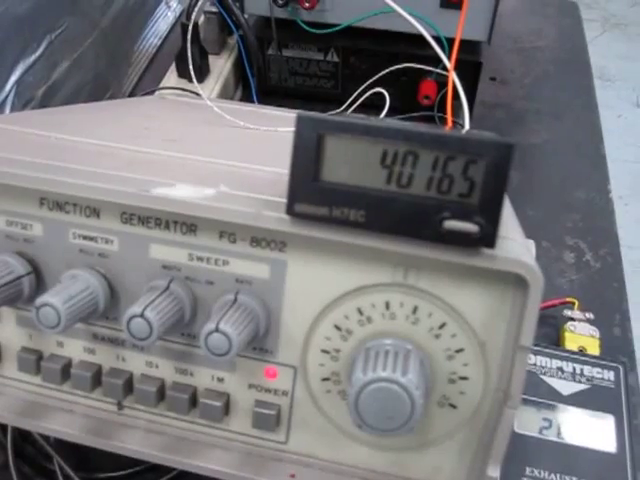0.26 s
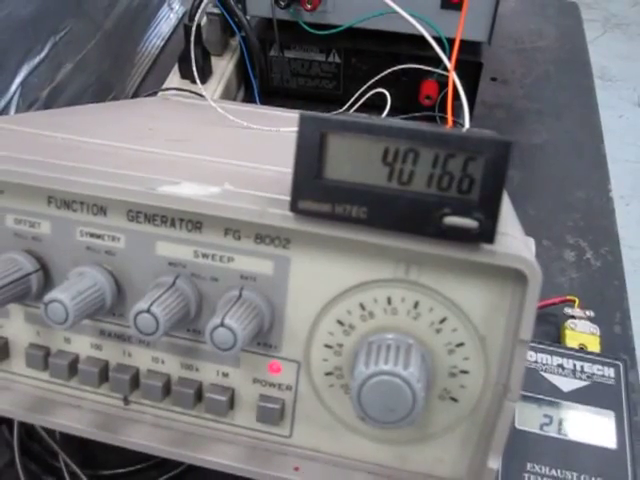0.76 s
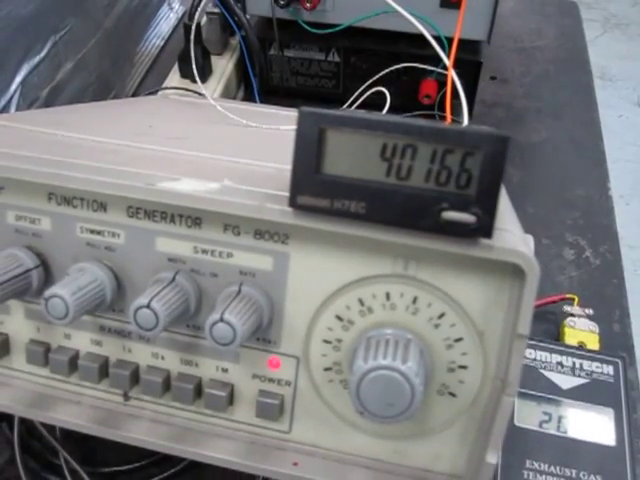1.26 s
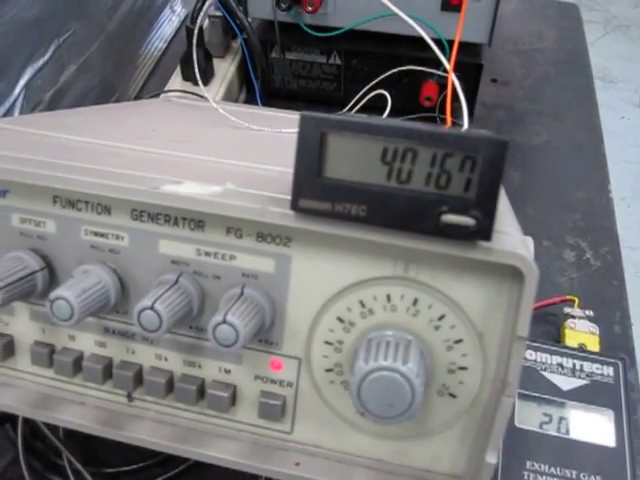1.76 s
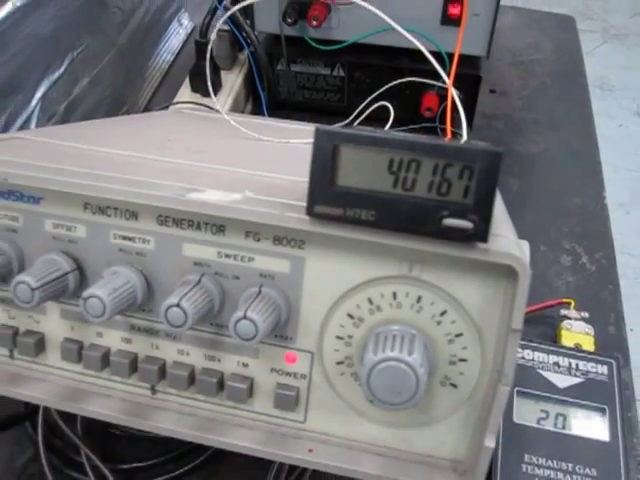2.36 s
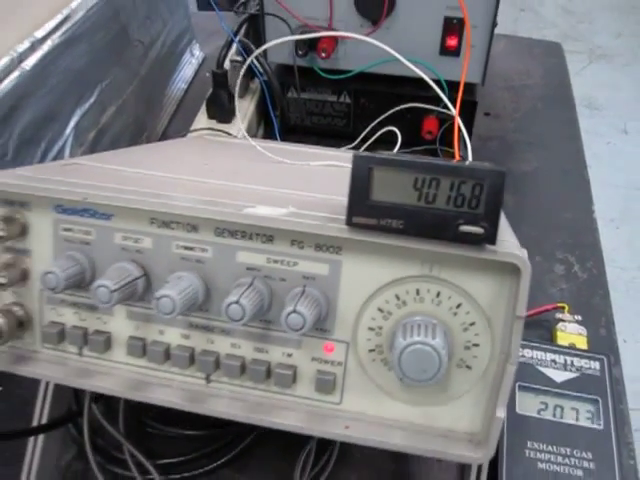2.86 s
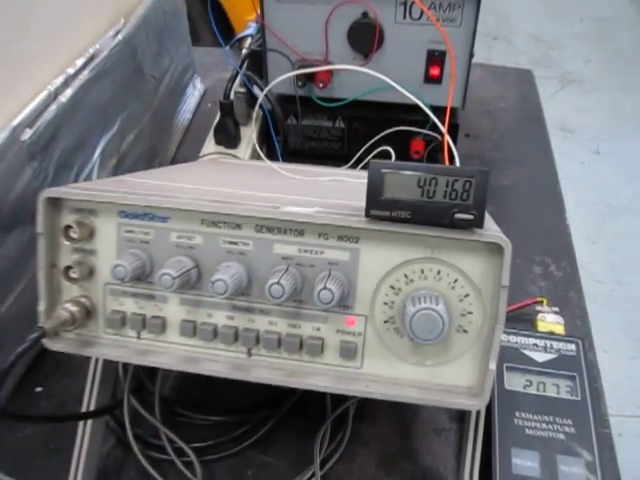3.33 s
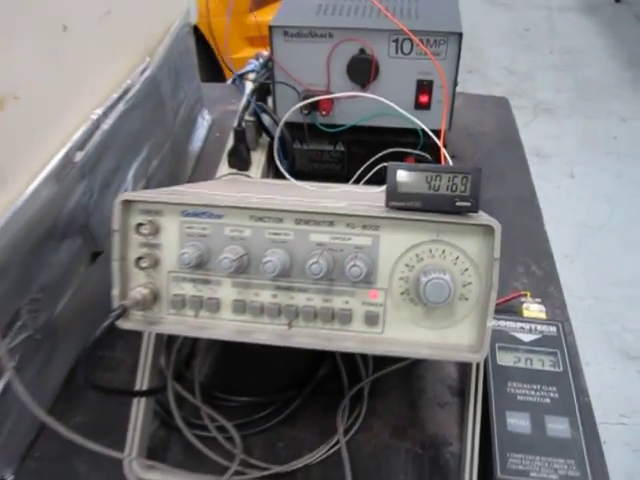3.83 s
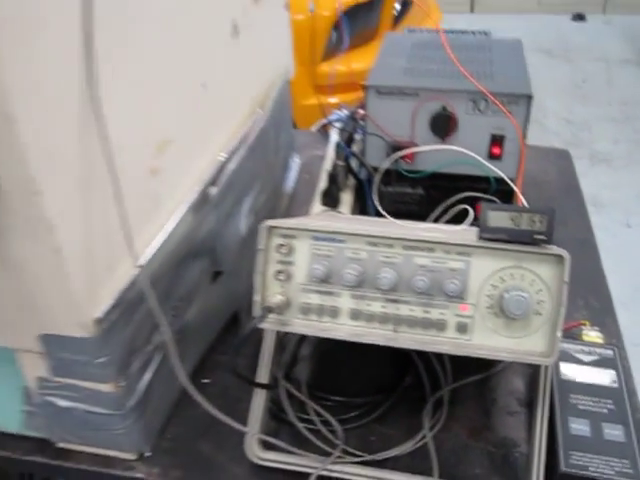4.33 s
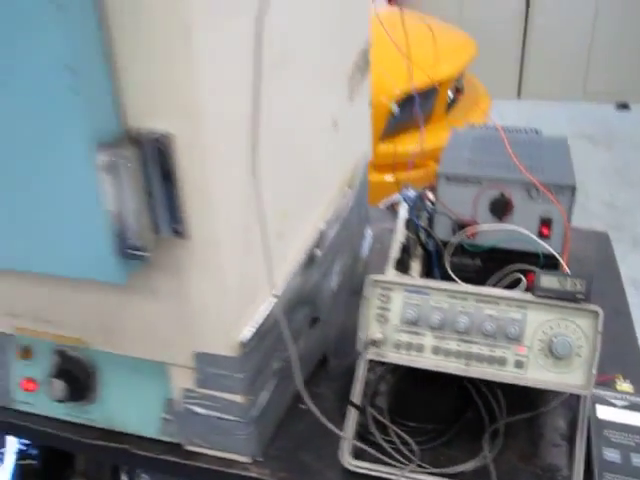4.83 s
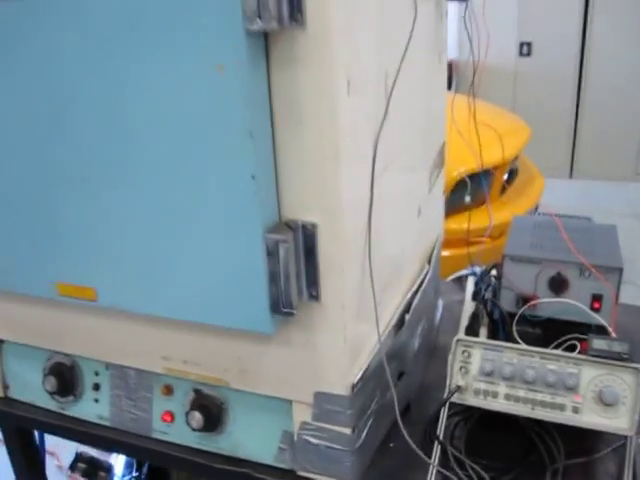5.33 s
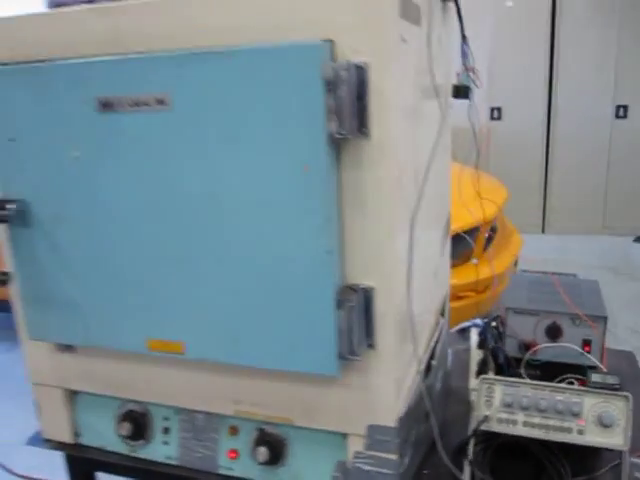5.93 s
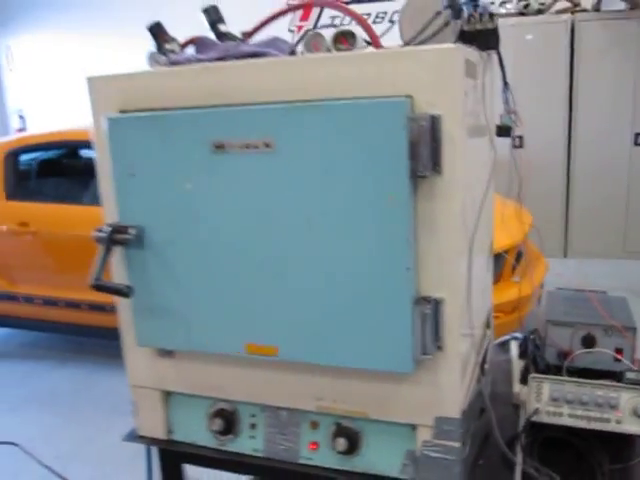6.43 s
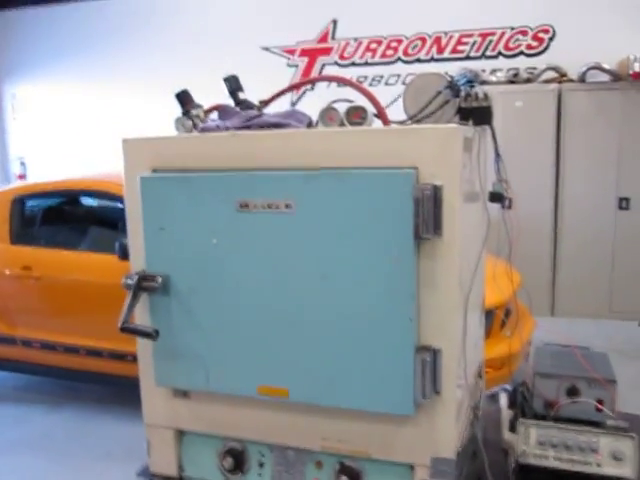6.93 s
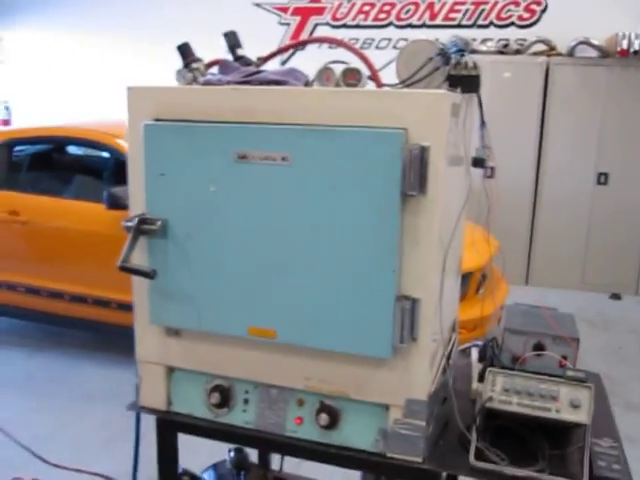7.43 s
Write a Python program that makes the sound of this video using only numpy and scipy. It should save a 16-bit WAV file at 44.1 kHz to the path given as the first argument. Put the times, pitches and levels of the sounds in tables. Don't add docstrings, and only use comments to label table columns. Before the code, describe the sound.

A loud mechanical drone runs throughout: a pump with a low, pulsing buzz, several steady mid tones and a grainy roar with fine repeating hiss. Over it a valve fires at about 0.65, 1.75, 2.85, 3.9, 5.0, 6.1 and 7.2 seconds. Each firing is a hollow, rough knock of some tens of milliseconds, overlapped by a burst of air and a soft low thud, then a short bleed of hiss and hard-room reverberation. The first two are dull, the second strong with a whistle; the third is thin, the fifth very hollow, the sixth bright, the last weak and thin. The background dips briefly after each. Until 3 seconds the microphone stays close; then it backs away, the drone's tones fading and shifting unevenly, roar dropping, thuds shrinking, until the distant last shot and lighter hum at 7.7 seconds.

```python
import sys
import numpy as np
from scipy import signal
from scipy.fft import rfft, irfft
from scipy.io import wavfile
from scipy.ndimage import uniform_filter1d

SR = 44100
rng = np.random.default_rng(int(sys.argv[2]) if len(sys.argv) > 2 else 0)


def materialize(psi):
    bounded = np.clip(np.atleast_2d(psi).T, -1, 1)
    quanta = np.round(bounded * 32767).astype(np.int16)
    wavfile.write(sys.argv[1], SR, quanta)


def field_ratio(decibels):
    return 10 ** (np.asarray(decibels, dtype=float) / 20)


N = 338688

# (time [s], distance [0-1])
WALK = [
    (0, 0.21),
    (1.5, 0.2),
    (3, 0.28),
    (4, 0.42),
    (5, 0.53),
    (6, 0.63),
    (6.8, 0.74),
    (7.68, 0.78),
]
SHAFT_HZ = 29.31
LOUD_ORDERS = (4, 8, 12, 16, 20, 36)
# (near level [dB], far level [dB], echo level [dB], node distance [0-1], node spacing [0-1])
STANDING = [(-38.5, -32, -31, 0.82, 1.92), (-21.5, -55, -44.5, 0.48, 0.35),
            (-31.5, -28.5, -44.1, 0.45, 0.57), (-49.5, -31, -44, 0.67, .49), (-22.5, -47.5, -42, 0.61, 0.5),
            (-29.5, -40.5, -44.5, 0.75, 0.43)]
WEAK_ORDERS = (11, 13, 14, 18, 19, 24, 28, 34, 40, 45, 71, 130, 226, 236, 348, 368, 384)
# (near level [dB], far level [dB])
WEAK_LEVELS = [(-46, -47.5), (-46, -44), (-52, -86), (-34, -61), (-33.5, -44), (-28, -62), (-40, -45.5),
               (-29.5, -73), (-34, -44), (-33, -45), (-34, -56), (-47.5, -41), (-39, -42), (-36.5, -40),
               (-42, -66), (-38, -45), (-48, -39)]
# (frequency [Hz], near level [dB], far level [dB])
FAN = [(151.7, -41.5, -58), (296, -33, -64)]
# (frequency [Hz], near level [dB per Hz], far level [dB per Hz])
ROAR = [(22, -42, -61), (60, -46.5, -58), (185, -46.5, -55), (378, -41.5, -53), (600, -29, -51.5),
        (834, -41.5, -44.5), (1106, -33.5, -49.5), (2000, -44, -49), (2500, -44.5, -53.5),
        (3300, -43, -49.5), (5140, -46, -49), (7250, -43.5, -46.5), (8840, -50, -50.5),
        (12150, -44.5, -40.5)]
# (frequency [Hz], repeating share [0-1], memory per turn [0-1])
REPEAT = [(200, .3, .9), (1400, .22, .88), (3000, .33, .8), (6000, .66, .64), (10500, .84, .54),
          (14500, .7, .43)]
# (time [s], strength [dB], hollowness [dB], brightness [dB], extra air [dB])
FIRINGS = [
    (.648, .6, 1.1, -8, 0),
    (1.741, 2.5, 2.5, -14, -1.5),
    (2.83, 0.5, -8, .2, 0.5),
    (3.921, -1, 2, 3, -1.8),
    (5.008, 0.3, 7.5, 0.5, -1.7),
    (6.1, 1, -6, 5.5, 0),
    (7.188, -3, -11, -3.5, 0.2),
]
# (low panel level [dB], high panel level [dB], whistle frequency [Hz], whistle level [dB])
TAILS = [
    (-14, -19, 4480, -19),
    (-23, -17.5, 7400, -26),
    (-11.5, -20, 4740, -18),
    (-22, -16, 3000, -42),
    (-24, -16, 2400, -38),
    (-18, -20, 3280, -23),
    (-27, -19, 5600, -27),
]
# (frequency [Hz], width [Hz], rise [s], length [s])
BODY = [(1113, 110, 0.0059, 0.016), (1360, 180, .004, 0.027), (1694, 255, 0.0041, 0.035),
        (2020, 370, 0.0094, 0.042), (2530, 520, .011, 0.044)]
# (level [dB], share of hollowness [1], share of brightness [1])
VOICING = [(-20.5, 1, 0), (-17.5, -0.05, 0.16), (-13.5, -0.041, 0), (-17, 0.21, 0.21), (-17.5, 0.61, 0.7)]
PANELS_HZ = (1364, 1730)
# (frequency [Hz], level [dB])
RUSH = [(700, -15.5), (1300, 1.5), (2500, -1.5), (3600, -8.5), (5500, -6.5), (8000, -6), (11500, -6.5),
        (17000, -22)]
# (frequency [Hz], level [dB])
BLEED = [(900, -13), (1500, 5.5), (2700, -2), (3600, 1.5), (5500, -3), (7500, -9.5), (11000, -30),
         (17000, -26)]
# (frequency [Hz], time to fall 60 dB [s])
ROOM = [(60, .5), (1400, 0.96), (3000, 0.83), (6000, 1.03), (12000, 0.51)]


def evened(x):
    return x / np.sqrt(np.mean(x ** 2) + 1e-20)


def read(points, hz, column=1):
    points = np.array(points)
    return np.interp(np.log(hz + 1), np.log(points[:, 0] + 1), points[:, column])


def distance(t):
    return np.interp(t, *np.transpose(WALK))


def between(near, far, share):
    return near + share * (far - near)


def standing(far, near_db, far_db, echo_db, node, spacing):
    echo = field_ratio(echo_db) * np.exp(2j * np.pi * (far - node) / spacing)
    return abs(field_ratio(between(near_db, far_db, far)) - echo)


def hum():
    t = np.arange(N) / SR
    far = distance(t)
    angle = 2 * np.pi * SHAFT_HZ * t
    total = np.zeros(N)
    for order, row in zip(LOUD_ORDERS, STANDING):
        total += standing(far, *row) * np.cos(order * angle + 0.11 * order)
    weak = [(order * SHAFT_HZ, *levels) for order, levels in zip(WEAK_ORDERS, WEAK_LEVELS)]
    for hz, near_db, far_db in weak + list(FAN):
        total += field_ratio(between(near_db, far_db, far)) * np.cos(2 * np.pi * (hz * t + rng.random()))
    return np.sqrt(2) * total


def roar(level_db=28, top_fall_db=45.5, patchy_db=1.5, flicker_db=0.6, stroke=0.044):
    hz = np.fft.rfftfreq(N, 1 / SR)
    share = np.clip(read(REPEAT, hz), 0, 0.97)
    memory = np.clip(read(REPEAT, hz, column=2), 0, 0.97)
    comb = (1 - memory ** 2) / abs(1 - memory * np.exp(-2j * np.pi * hz / SHAFT_HZ)) ** 2
    noise = irfft(rfft(rng.standard_normal(N)) * np.sqrt(1 - share + share * comb), N)
    noise *= 1 + stroke * np.cos(2 * np.pi * 4 * SHAFT_HZ * np.arange(N) / SR)

    hz, t, z = signal.stft(noise, SR, nperseg=2048, noverlap=1536)
    near_db, far_db = read(ROAR, hz)[:, None], read(ROAR, hz, column=2)[:, None]
    colour_db = between(near_db, far_db, distance(t))
    top_db = -top_fall_db * np.log2(np.maximum(hz / ROAR[-1][0], 1))[:, None]
    patches = rng.standard_normal(z.shape[::-1]).T
    patches = uniform_filter1d(patches, size=9, axis=0)
    patches = evened(uniform_filter1d(patches, size=60, axis=1))
    flicker = evened(uniform_filter1d(rng.standard_normal(len(t)), size=4))
    drift_db = patchy_db * patches + flicker_db * flicker
    z = z * field_ratio(level_db + colour_db + top_db + drift_db)
    return signal.istft(z, SR, nperseg=2048, noverlap=1536)[1][:N]


def resonate(x, hz, width):
    turn = np.exp(2j * np.pi * hz * np.arange(len(x)) / SR)
    r = np.exp(-np.pi * width / SR)
    slow = x / turn
    for _ in range(2):
        slow = signal.lfilter([1 - r], [1, -r], slow)
    return 2 * (turn * slow).real


def steadied(x, share):
    return evened(x / (abs(signal.hilbert(x)) + 1e-9) ** share)


def burst(t, rise, fall):
    return (1 - np.exp(-(t / rise) ** 2)) * np.exp(-t / fall)


def stroke_of(t, rise, length):
    return (1 - np.exp(-(t / rise) ** 2)) * (0.6 + t / 0.03) * np.exp(-(t / length) ** 4)


def knock(strength_db, hollow_db, bright_db, panels_db):
    t = np.arange(SR // 2) / SR
    drive = rng.standard_normal(len(t))
    body, panels = np.zeros(len(t)), np.zeros(len(t))
    for (db, low, high), (hz, width, rise, length) in zip(VOICING, BODY):
        mode_db = strength_db + db + low * hollow_db + high * bright_db
        body += field_ratio(mode_db) * steadied(resonate(drive, hz, width), 0.72) * stroke_of(t, rise, length)
    for hz, db in zip(PANELS_HZ, panels_db):
        panels += field_ratio(db) * steadied(resonate(drive, hz, 20), 0.75)
    return body + panels * burst(t, 0.017, 0.12)


def puff(jet_db, whistle_hz, whistle_db, thud_db):
    t = np.arange(SR // 2) / SR
    white = rng.standard_normal(len(t))
    hz, spectrum = np.fft.rfftfreq(len(t), 1 / SR), rfft(white)
    rush = evened(irfft(spectrum * field_ratio(read(RUSH, hz)), len(t)))
    bleed = evened(irfft(spectrum * field_ratio(read(BLEED, hz)), len(t)))
    jet = field_ratio(-2.5) * rush * stroke_of(t, 0.0067, 0.032) + field_ratio(-9.5) * bleed * burst(t, 0.02, 0.12)
    whistle = evened(resonate(white, whistle_hz, 210)) * burst(t, 0.0044, 0.063)
    push = np.sin(2 * np.pi * 58 * t) * burst(t, 0.0042, 0.016)
    first_swing = field_ratio(-11) * np.roll(push, round(0.033 * SR))
    second_swing = field_ratio(-8) * np.roll(push, round(0.078 * SR))
    thud = push + first_swing + second_swing
    return field_ratio(jet_db) * jet + field_ratio(whistle_db) * whistle + field_ratio(thud_db) * thud


def workshop(x):
    taps = np.zeros(SR)
    at = np.arange(500, SR - 20, 20) + rng.integers(0, 20, (SR - 501) // 20)
    taps[at] = rng.choice([-1., 1.], len(at))
    hz, t, z = signal.stft(taps, SR, nperseg=256)
    tail = signal.istft(z * field_ratio(-60 * t / read(ROOM, hz)[:, None]), SR, nperseg=256)[1]
    return signal.fftconvolve(x, tail / np.linalg.norm(tail))[:N]


def add(mix, s, sound):
    part = mix[round(s * SR):][:len(sound)]
    part += sound[:len(part)]


def scene():
    metal, air = np.zeros(N), np.zeros(N)
    for (s, *colour, air_db), (*panels_db, whistle_hz, whistle_db) in zip(FIRINGS, TAILS):
        far = distance(s)
        jet_db = between(-3.5, -7.5, far) + air_db
        thud_db = between(-9.5, -27, far)
        add(metal, s - 0.005, knock(*colour, panels_db))
        add(air, s + 0.017 - 0.008, puff(jet_db, whistle_hz, whistle_db, thud_db))
    into_room = air + field_ratio(-5) * metal
    valve = metal + air + field_ratio(-2.5) * workshop(into_room)
    return (valve + hum() + roar())[None]


def top_cut(x):
    return signal.sosfilt(signal.butter(12, 17230, fs=SR, output="sos"), x)


def record(dry):
    dry = signal.lfilter(*signal.butter(2, 45, "high", fs=SR), dry)
    lead = SR // 8
    memory = burst(np.arange(lead) / SR, 0.0027, 0.015)
    padded = np.pad(dry ** 2, ((0, 0), (lead, 0)), "reflect")
    power = signal.oaconvolve(padded, memory[None] / memory.sum())[:, lead:][:, :N]
    power_db = 10 * np.log10(abs(power) + 1e-12)
    over_db = np.logaddexp(0, (power_db + 17) / 1.2) * 1.2
    ducked = dry * field_ratio(0.55 - 1.1 * over_db)
    mix = 1.089 * np.tanh(ducked / 1.106)
    return top_cut(mix)


dry = scene()
out = record(dry)
materialize(out)
```